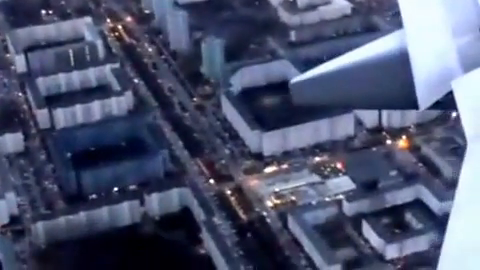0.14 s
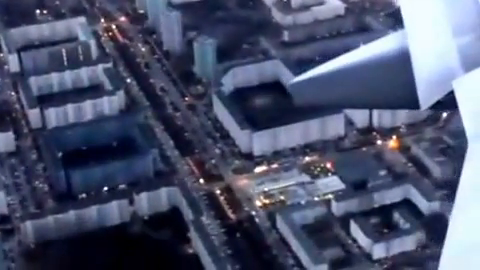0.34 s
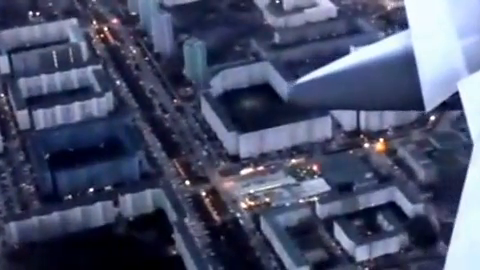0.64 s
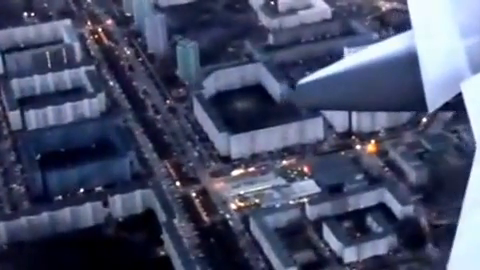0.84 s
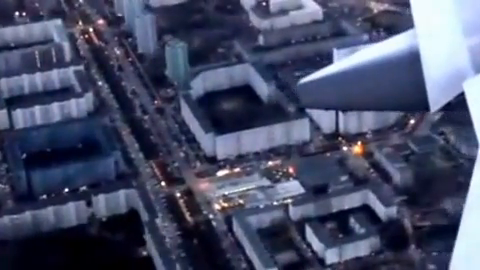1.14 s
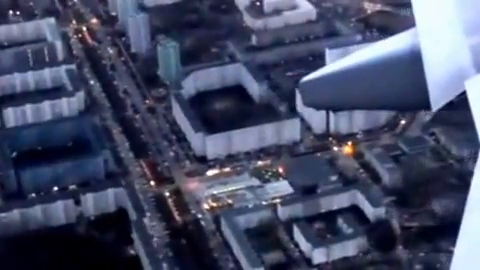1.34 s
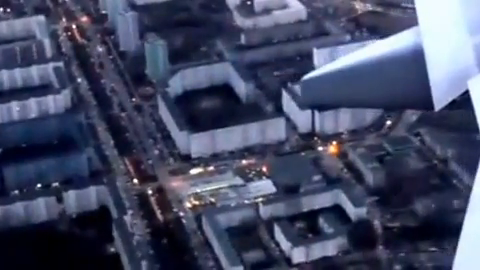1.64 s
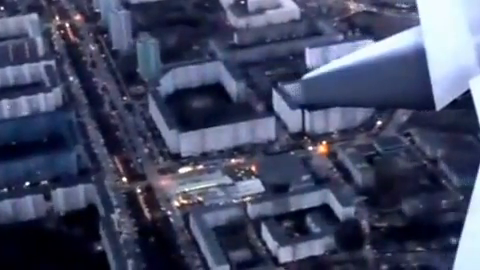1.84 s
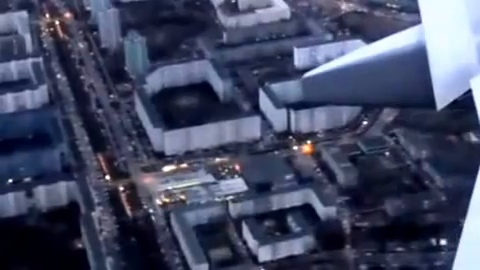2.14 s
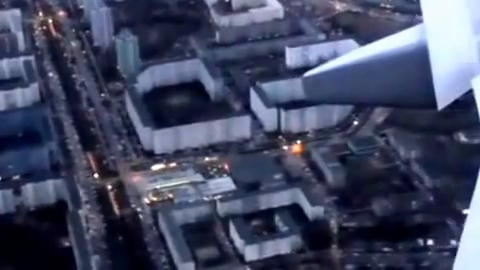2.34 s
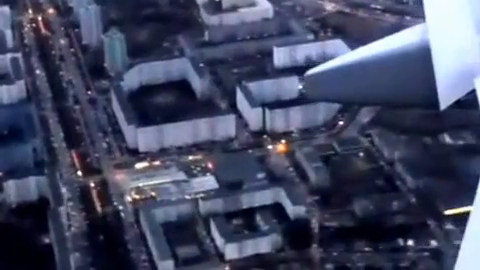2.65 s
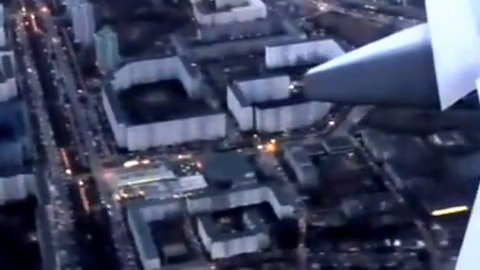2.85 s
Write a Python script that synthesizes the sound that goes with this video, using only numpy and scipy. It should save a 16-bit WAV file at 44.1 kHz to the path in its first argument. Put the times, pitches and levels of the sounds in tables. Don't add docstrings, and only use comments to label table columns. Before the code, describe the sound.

A steady, heavy low jet roar fills an airliner cabin throughout, swelling slightly around 1 and 1.7 seconds, easing near 2.5, strongest at the end. Muffled air rush, faint hiss and barely audible fan whine lie over it. A short plastic latch knock with a tiny rattle comes at 0.55. Faint handling ticks and dull puffs cluster around 1.0-1.1 and 1.9-2.0; barely audible high squeaks follow from 2.6, a tick at 2.9.

```python
import sys
import numpy as np
from scipy import signal
from scipy.fft import rfft, irfft, next_fast_len
from scipy.io import wavfile

SR = 44100
rng = np.random.default_rng(int(sys.argv[2]) if len(sys.argv) > 2 else 0)


def pcm_store(signal):
    levels = np.round(np.clip(np.atleast_2d(signal), -1, 1) * 32767)
    wavfile.write(sys.argv[1], SR, levels.astype(np.int16).T)


def gain_from_db(level_db):
    decades = np.asarray(level_db, float) / 20
    return 10 ** decades


N = 131859

# [t/s, level/dB]
THRUST = [
    (0, -13.5),
    (.5, -14.5),
    (.95, -13),
    (1.3, -13.8),
    (1.701, -12.5),
    (2.1, -14),
    (2.501, -15),
    (2.99, -12),
]
# [f/Hz, density/dB]
ROAR_SPECTRUM = [(13, -72), (22, -38), (48, -26), (61, -20.5), (83, -6.5), (162, 0.5), (277, -3.5),
                 (422, -18), (700, -29.5), (910, -62.5), (1540, -120)]
# [f/Hz, density/dB]
AIRFLOW_SPECTRUM = [(240, -27), (400, -4.5), (847, -11.5), (978, -12), (1230, -16), (1540, -20.5),
                    (1820, -26.5), (2090, -27), (3000, -42.5), (3900, -82), (6600, -120)]
# [f/Hz, density/dB]
VENT_SPECTRUM = [(1800, -24), (2650, -6.5), (3050, -2.5), (4250, 1.5), (5450, -1.5), (7050, -6),
                 (9050, -15), (11100, -17.5), (16000, -24)]
# [f/Hz, width/Hz, lift/dB]
PANELS = [(185.8, 100, 0.5), (302, 20, 3.5), (716, 20, 3.5), (1005, 40, 3.5), (1407, 23, 1), (1630, 52, 3),
          (2113, 130, 6), (3436, 260, 7.5), (5400, 160, 3.5)]
# [f/Hz, side under mid/dB]
WIDTH = [(60, -20), (200, -23.5), (330, -18.5), (500, -14), (770, -10), (1800, -11), (2740, -5.5),
         (6800, -8)]
# [f/Hz, left-right/dB]
LEAN = [(60, 0), (250, 0.1), (600, -1.5), (1200, -3), (2000, 0.7), (4000, 0.5), (9000, -1)]
TONE_HZ = [449, 501, 898, 1499.5, 1795, 2996.5]
# [level/dB, wander/Hz, left-right/dB]
TONES = [(-41.5, 1.5, 1.5), (-46, 2.2, 0.5), (-53.5, 2.4, -1.3), (-51.5, 2.52, 1), (-70, 2.4, 2),
         (-79, 3.6, 1.5)]
# [t/s, level/dB]
KNOCK = [
    (0.5512, -23),
    (0.5533, -16.5),
    (0.5613, -28.5),
    (0.569, -32.5),
]
# [f/Hz, level/dB, t60/s]
LATCH_MODES = [(680, -2, .05), (834, 0.5, 0.063), (967, -13.5, 0.031), (1330, -4.5, 0.059),
               (1594, -2.5, .05), (1810, -12.5, 0.043), (2053, -9, .045), (3470, -26.5, .025),
               (4400, -23, .025), (4700, -21.5, 0.031), (5100, -23, 0.037), (5830, -24, .025),
               (6400, -27, 0.023), (7100, -29, .025)]
# [t/s, peak level/dB]
TICKS = [
    (1.0623, -43.5),
    (1.1007, -44),
    (1.1253, -39),
    (1.6216, -44.5),
    (1.8944, -39),
    (1.907, -37.5),
    (1.959, -44),
    (2.918, -41.5),
]
# [t/s, level/dB]
THUMPS = [
    (0.968, -32),
    (1.979, -33),
]
# [t/s, length/s, level/dB]
SQUEAKS = [
    (2.568, 0.043, -59.5),
    (2.612, 0.047, -60),
    (2.654, 0.061, -63),
    (2.868, .09, -68.5),
]


def rms_one(x):
    return x / np.sqrt(np.mean(x ** 2) + 1e-20)


def at_hz(points, hz):
    table_hz, table_db = np.array(points)[:, 0], np.array(points)[:, 1]
    return np.interp(np.log(hz), np.log(table_hz), table_db)


def drift(rate_hz):
    hop = 40
    r = np.exp(-2 * np.pi * rate_hz * hop / SR)
    noise = rng.standard_normal(N // hop + 2002)
    slow = signal.lfilter([1], [1, -2 * r, r * r], noise)[2000:]
    return np.interp(np.arange(N) / hop, np.arange(len(slow)), rms_one(slow))


def ring(clicks, hz, t60):
    r, w = gain_from_db(-60 / (t60 * SR)), 2 * np.pi * hz / SR
    return signal.lfilter([0, np.sin(w)], [1, -2 * r * np.cos(w), r * r], clicks + 1e-18)


def band(x, low_hz, high_hz):
    return signal.sosfilt(signal.butter(2, [low_hz, high_hz], "band", fs=SR, output="sos"), x)


def low_pass(x, hz):
    return signal.sosfilt(signal.butter(8, hz, fs=SR, output="sos"), x)


def cabin_noise(spectrum, patchy_db):
    size = next_fast_len(N)
    hz = np.maximum(np.arange(size // 2 + 1) * SR / size, 1)
    db = at_hz([(1, -120)] + list(spectrum) + [(SR / 2, -120)], hz)
    for panel_hz, width_hz, lift_db in PANELS:
        db = db + lift_db / (1 + (2 * (hz - panel_hz) / width_hz) ** 2)
    mid, side = rfft(rng.standard_normal((2, size))) * gain_from_db(db)
    side = side * gain_from_db(at_hz(WIDTH, hz))
    pair = np.array([mid + side, mid - side]) * gain_from_db(at_hz(LEAN, hz) * np.array([[.5], [-.5]]))
    out, shared = 0, drift(0.6)
    lowest = np.floor(np.log2(spectrum[0][0]))
    highest = np.ceil(np.log2(spectrum[-1][0]))
    for centre in 2. ** np.arange(lowest, highest + 2):
        share = np.cos(np.pi / 2 * np.clip(np.log2(hz / centre), -1, 1)) ** 2
        octave = irfft(pair * share, size)[:, :N]
        out = out + octave * gain_from_db(patchy_db * (.5 * shared + drift(6.0)))
    return rms_one(out)


def jet_roar(thrust_db):
    return gain_from_db(thrust_db) * cabin_noise(ROAR_SPECTRUM, patchy_db=.2)


def airflow(thrust_db):
    level_db = -31 + .1 * (thrust_db - thrust_db.mean())
    return gain_from_db(level_db) * cabin_noise(AIRFLOW_SPECTRUM, patchy_db=.25)


def vents():
    return gain_from_db(-54.5) * cabin_noise(VENT_SPECTRUM, patchy_db=.2)


def fan_and_pump_tones():
    out = np.zeros((2, N))
    for hz, (db, wander_hz, pan_db) in zip(TONE_HZ, TONES):
        phase = 2 * np.pi * np.cumsum(hz + wander_hz * drift(2.8)) / SR
        level = np.sqrt(2) * gain_from_db(db + 2.5 * drift(1.2))
        pan = gain_from_db(np.array([[pan_db], [-pan_db]]) / 2)
        out += level * np.sin(phase + np.array([[0], [.6]])) * pan
    return out


def latch_knock():
    crack_db, crack_t60_s, crack_rise_s = -25, .05, .00068
    out, t = np.zeros((2, N)), np.arange(N) / SR
    contact_s, contact_db = np.transpose(KNOCK)
    for hz, level_db, t60 in LATCH_MODES:
        for port in out:
            lag = 0 if port is out[0] else 0
            break
        lags = (0, rng.uniform(0, .25) * SR / hz)
        for port, lag in zip(out, lags):
            clicks = np.zeros(N)
            uneven_db = rng.normal(0, 1.2, len(contact_s))
            clicks[(contact_s * SR + lag).astype(int)] = gain_from_db(contact_db + level_db + 2 + uneven_db)
            port += ring(clicks, hz, t60)
    shape = 0
    for start, db in KNOCK:
        decay_db = -60 * np.clip(t - start, 0, 1) / crack_t60_s
        shape = shape + np.clip((t - start) / crack_rise_s, 0, 1) * gain_from_db(db - contact_db[1] + decay_db)
    noise = rng.standard_normal((3, N))
    out = out + gain_from_db(crack_db) * shape * band(noise[0] + 0.24 * noise[1:], 3100, 6300)
    return low_pass(out, 7400)


def camera_ticks():
    low_hz, high_hz, sweep_s = 2400, 9300, .0024
    tail_db, tail_t60_s = -1, .079
    out, t = np.zeros((2, N + SR)), np.arange(2000) / SR
    u = np.clip(t / sweep_s, 0, 1)
    phase = 2 * np.pi * np.cumsum(low_hz + (high_hz - low_hz) * u) / SR
    chirp = np.sin(phase) * np.sin(np.pi * u) ** .5
    for s, db in TICKS:
        rough = 1 + .9 * rms_one(band(rng.standard_normal((2, len(t))), 300, 1500))
        tail = band(rng.standard_normal((2, len(t))), 2300, 9500) * gain_from_db(tail_db - 60 * t / tail_t60_s)
        start = int(s * SR)
        out[:, start:start + len(t)] += gain_from_db(db) * (chirp * rough + tail)
    return low_pass(out[:, :N], 10400)


def side_thumps():
    t = np.arange(N) / SR
    noise = rms_one(band(band(rng.standard_normal(N), 250, 1300), 250, 1500))
    envelope = sum(gain_from_db(db) * np.exp(-((t - s) / .003) ** 2) for s, db in THUMPS)
    return envelope * noise * [[.7], [-1]]


def seat_squeaks():
    t, squeak_hz = np.arange(N) / SR, 10450
    whistle = rms_one(band(rng.standard_normal(N), squeak_hz - 90, squeak_hz + 90))
    swell = 0
    for s, length, db in SQUEAKS:
        swell = swell + gain_from_db(db) * np.sin(np.pi * np.clip((t - s) / length, 0, 1))
    return whistle * swell


def scene():
    thrust_db = np.interp(np.arange(N) / SR, *np.transpose(THRUST))
    steady = jet_roar(thrust_db) + airflow(thrust_db) + vents() + fan_and_pump_tones()
    return steady + latch_knock() + camera_ticks() + side_thumps() + seat_squeaks()


def top_cut(x):
    return signal.sosfilt(signal.butter(12, 15750, fs=SR, output="sos"), x)


def record(dry):
    ceiling, narrow_hz, narrow_db = .86, 6880, -7
    x = np.clip(dry, -ceiling, ceiling)
    mid, side = (x[0] + x[1]) / 2, rfft(x[0] - x[1]) / 2
    hz = np.arange(len(side)) * SR / N
    side = irfft(side * gain_from_db(narrow_db * (hz > narrow_hz)), N)
    return top_cut(np.array([mid + side, mid - side]))


dry = scene()
out = record(dry)
pcm_store(out)
```